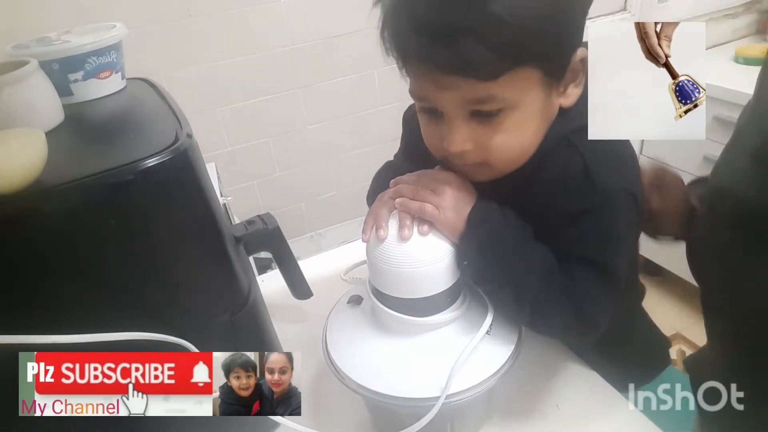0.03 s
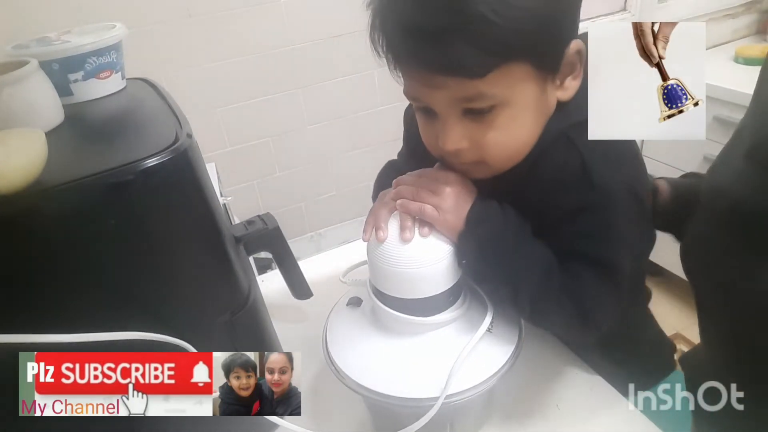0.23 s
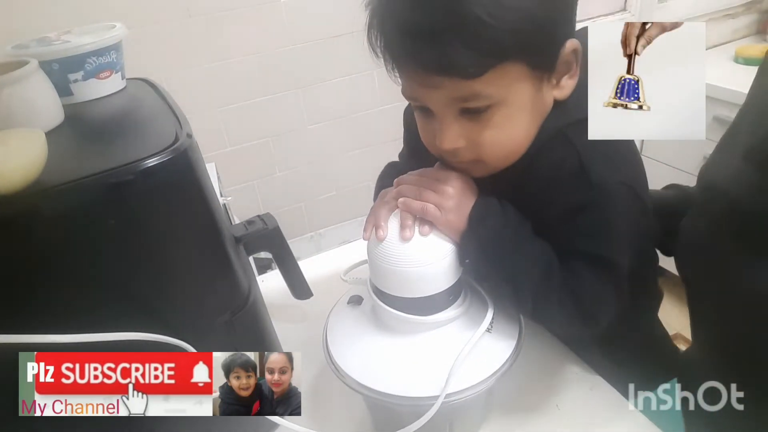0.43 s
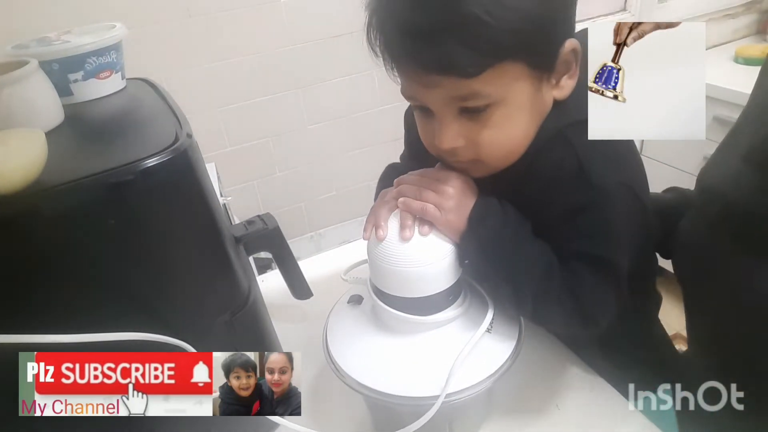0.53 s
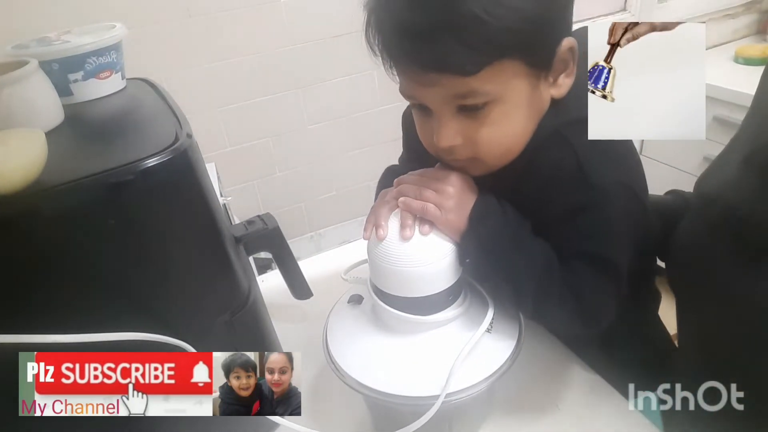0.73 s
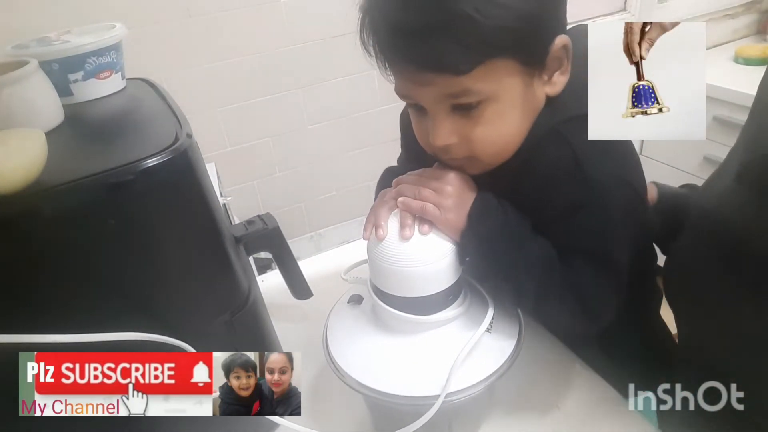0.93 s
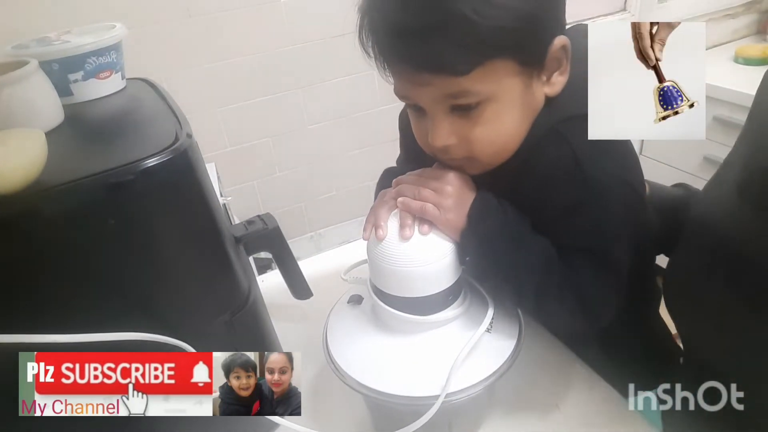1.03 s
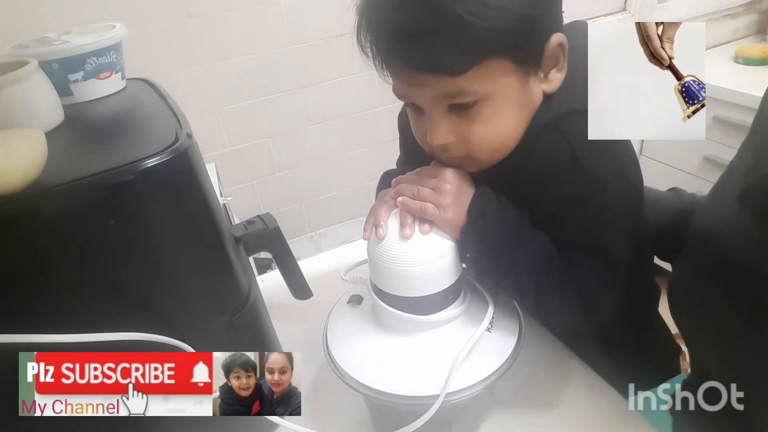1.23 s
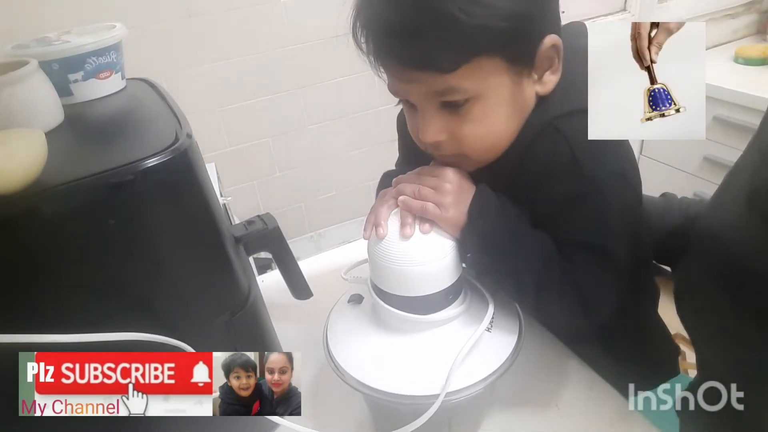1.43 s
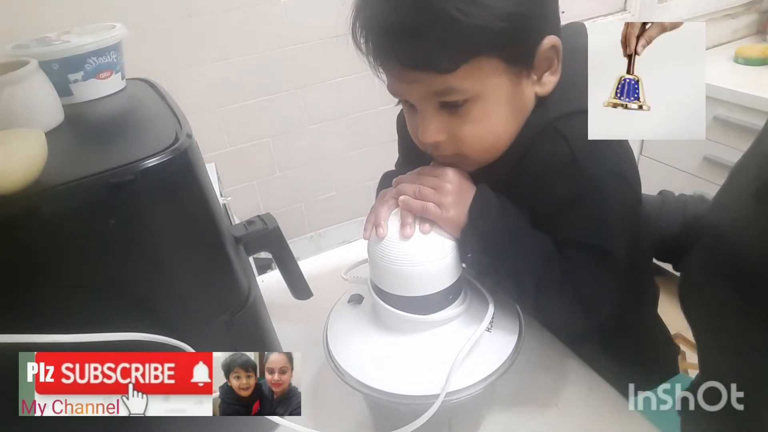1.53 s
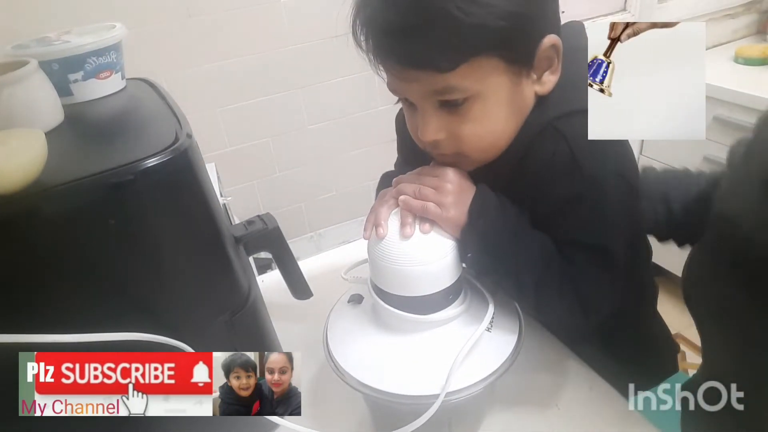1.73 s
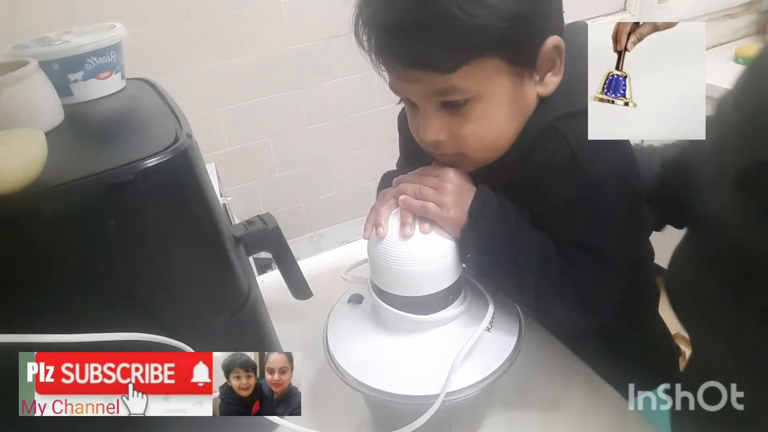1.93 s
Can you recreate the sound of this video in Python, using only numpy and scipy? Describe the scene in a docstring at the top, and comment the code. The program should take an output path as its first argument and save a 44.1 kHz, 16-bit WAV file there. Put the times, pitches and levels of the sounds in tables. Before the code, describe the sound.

An electric chopper whirs through one short pulse, flinging dry spices around its plastic bowl with surging rattles, crunches and a few low knocks before coasting to a stop. The microphone is close, in a small tiled kitchen.

```python
"""Small tiled kitchen, close microphones: an electric chopper on the counter is pressed once, grinds
hard dry spices and runs down. The motor hums as it starts; the unbalanced shaft whirrs. The load shakes
the housing, which drones at its low resonances, and jams knock it. The blade flings grit and coarse
pieces against the plastic bowl in surges; whole pieces clack on the wall, crunch and crack."""
import sys
import numpy as np
from scipy import signal
from scipy.fft import rfft, irfft
from scipy.io import wavfile
from scipy.ndimage import uniform_filter1d, map_coordinates

SR = 44100
rng = np.random.default_rng(int(sys.argv[2]) if len(sys.argv) > 2 else 0)


def wrap_up_sound(samples):
    """Save the sound to the file named by the first command line argument, as 16-bit audio."""
    columns = np.atleast_2d(samples).T
    # keep every value between -1 and 1, then stretch to whole-number steps
    tamed = np.clip(columns, -1, 1)
    steps = np.round(tamed * 32767).astype(np.int16)
    wavfile.write(sys.argv[1], SR, steps)


N = 88200
T = np.arange(N) / SR

START_S, STOP_S = .198, 1.45
GRIT_PER_S, GRIT_SCATTER_DB = 4600, 4.5
COARSE_PER_S, COARSE_SCATTER_DB = 900, 4

# background noise (frequency [Hz], gain [dB])
FLOOR_EQ = [(30, -3), (100, -1), (400, -10), (1500, -23), (15000, -21)]
# echo off the tiles (frequency [Hz], gain [dB])
ROOM_EQ = [(80, -32), (180, 8), (350, 2.5), (700, 0), (4000, -0.5), (15000, -12.5)]
# stereo width (frequency [Hz], side gain [dB])
SIDE_EQ = [(30, -10), (110, -16), (180, -10), (320, -2), (15000, 2)]
# microphone response (frequency [Hz], left [dB], right [dB])
MIC_EQ = [(30, -40.5, -32), (51.4, -19.5, -15.5), (91, -1, -1), (2620, 2, 2), (3790, -0.5, -2.5),
          (4290, -3, -1.5), (4680, 4, 1.5), (6300, -0.5, 3.5), (8010, 1, 0), (8930, -11.5, -12.5),
          (9800, -7.5, -9.5), (10710, 2.5, -14), (12500, 2.5, -3.5), (15500, 2, -4.5)]
# starting-current hum (frequency [Hz], level [dB])
HUM_PARTIALS = [(102, -22.5), (202, -38), (303, -39.5)]
# shaft tone (time [s], frequency [Hz])
SHAFT_PITCH = [(.2, 158.5), (.5, 161.5), (.65, 161.5), (0.869, 158.5), (1.1, 155), (1.222, 166),
               (1.323, 182), (1.44, 187), (1.559, 176.5), (1.679, 167), (2.0, 163)]
# shaft harmonics 1 and 2 (level re drone [dB])
WHIRR_HARMONICS_DB = [-11.5, -6.5]
# housing vibration (time [s], drone [dB], rumble [dB])
SHAKE_LEVELS = [(.19, -55, -49), (.22, -29.5, -32.5), (.3, -35.5, -29), (.395, -33, -34),
                (.436, -23, -18.5), (.496, -27.5, -26.5), (.6, -25.5, -27.5), (.66, -21.5, -27),
                (.7, -24.5, -31), (.78, -26, -29), (.884, -23.5, -28), (1.06, -36.5, -30.5),
                (1.09, -30, -19), (1.15, -26.5, -33), (1.19, -27, -39), (1.294, -17, -27),
                (1.354, -22.5, -27.5), (1.41, -25.5, -51), (1.46, -26, -31.5), (1.6, -29, -33),
                (1.665, -28, -33), (1.76, -32.5, -34.5), (1.894, -40, -45.5), (2.0, -69, -67)]
# housing and counter resonances (frequency [Hz], t60 [s], left [dB], right [dB])
DRONE_MODES = [(313, 0.076, 2.5, -3), (351.7, 0.058, 2, -1.5), (395, 0.028, -6, -10.5)]
RUMBLE_MODES = [(112.4, 0.23, -11, -4.5), (164.4, 0.1, 9, -3), (187.5, 0.05, -19, 5.5)]
# jams knocking the housing (time [s], level [dB])
JAMS = [(0.2088, -12), (0.2192, -5.5), (0.65, -10), (1.069, -5), (1.082, -6.5), (1.0881, -7), (1.288, -4.5)]
# plastic bowl resonances (frequency [Hz], t60 [s], left [dB], right [dB])
BOWL_MODES = [(586, 0.07, -11, -2.5), (672.6, 0.066, -6, -7.5), (951, 0.029, 5.5, -5),
              (1166, 0.027, 4.5, -13), (1405, 0.052, 3, -1), (1513, 0.045, -5, -0.5),
              (1680, 0.051, -3.5, 0), (1813, 0.052, -7.5, -6), (2285, 0.055, -18, -6.5),
              (3475, 0.016, 10, -5.5), (3740, 0.017, 9, 6), (4810, 0.018, -7, 1.5)]
# hard pieces hitting the bowl (time [s], clack [dB], crunch [dB])
WALL_STRIKES = [(.4086, -16, -14), (.4415, -16, -18), (0.6098, -22, -31), (0.654, -18, -19),
                (0.7723, -20, -23), (0.8303, -23, -26), (0.8655, -28, -12), (.882, -21, -13),
                (1.0806, -23.5, -10.5), (1.197, -19.5, -35), (1.2567, -18, -20), (1.286, -20.5, -7),
                (1.305, -22, -19), (1.3215, -20.5, -12), (1.356, -23, -16), (1.4525, -14.5, -26),
                (1.512, -27, -23), (1.811, -34.5, -36)]
# whole pieces shattering (time [s], level [dB], centre [Hz])
PIECE_CRACKS = [(0.2342, -13, 2250), (0.297, -18, 7200), (0.371, -6, 6700), (0.383, -15, 6500),
                (0.426, -14, 4000), (0.4412, -13, 4500), (0.676, -8.5, 4500), (0.682, -19, 4570),
                (0.73, -11, 5240), (1.1362, -19, 4700), (1.146, -6.5, 8700), (1.194, -12, 11000),
                (1.2555, -14.5, 11100), (1.268, -14, 4400), (1.284, -16, 7000), (1.447, -17, 7800),
                (1.9, -44, 11100), (1.927, -48.5, 5060)]
# fine and coarse impact spectra (frequency [Hz], gain [dB])
GRIT_EQ = [(500, -4.5), (1500, -25), (2300, -8), (3600, 2.5), (4200, 1), (4900, -2), (5500, -0.5),
           (6500, 1), (8000, 0.5), (12000, -0.5), (15500, -4.5)]
COARSE_EQ = [(100, -16.5), (220, -1), (450, -0.5), (620, 0.5), (760, -1.5), (1000, -1), (1600, -5.5),
             (2200, -0.5), (4000, -8.5), (12000, -35)]
# grinding surges (time [s], grit [dB], coarse [dB])
GRIND_LEVELS = [(.198, -45, -51), (.204, -38.5, -40.5), (.216, -29, -26.5), (.236, -21.5, -24.5),
                (.335, -26, -29), (.368, -19.5, -27), (.4, -19.5, -27), (.425, -13.5, -19.5),
                (.476, -18.5, -25), (.55, -16, -23.5), (.598, -20, -26.5), (.635, -14, -21),
                (.675, -15.5, -17.5), (.695, -16, -24), (.78, -18, -23.5), (.825, -21.5, -27.5),
                (.874, -18.5, -21.5), (1.05, -25.5, -30), (1.085, -21, -20.5), (1.135, -16, -23),
                (1.165, -20.5, -28.5), (1.248, -20, -24), (1.268, -16.5, -21), (1.3, -19.5, -21),
                (1.41, -23.5, -25), (1.51, -24, -25.5), (1.8, -37, -36.5), (1.908, -50, -49.5),
                (2.0, -70, -72)]


def undb(db):
    """Decibels to gain."""
    return 10 ** (np.asarray(db) / 20)


def unit(x):
    """Scale to rms 1."""
    return x / np.sqrt(np.mean(x ** 2))


def curve(table, column):
    """Gain over time from a dB column; zero before switch-on."""
    rows = np.array(table)
    return undb(np.interp(T, rows[:, 0], rows[:, column])) * (T > START_S)


def fade(t, t60_s):
    """Exponential decay."""
    return np.exp(-np.log(1000) * t / t60_s)


def blow(at_s, rise_s, t60_s, hold_s=0):
    """Impact envelope: rise, hold, decay."""
    age_s = np.maximum(T - at_s, 0)
    return (1 - np.exp(-age_s / rise_s)) * fade(np.maximum(age_s - hold_s, 0), t60_s)


def ring(x, response):
    """Convolve with an impulse response."""
    return signal.fftconvolve(np.atleast_2d(x), np.atleast_2d(response), axes=1)[:, :N]


def bin_gains(eq, size):
    """Gain per FFT bin, interpolated over log frequency."""
    hz, db = np.array(eq, float).T
    bin_hz = np.arange(size // 2 + 1) * SR / size
    return undb(np.interp(np.log(bin_hz + 1), np.log(hz), db))


def colour(x, eq, size=4096):
    """Minimum-phase filter through (frequency [Hz], gain [dB]) points."""
    cepstrum = irfft(np.log(bin_gains(eq, size)))
    cepstrum[1:size // 2] *= 2
    cepstrum[size // 2 + 1:] = 0
    return ring(x, irfft(np.exp(rfft(cepstrum))))


def walk(per_s):
    """Smooth random drift, rms 1."""
    span = int(SR / per_s)
    steps = np.repeat(rng.standard_normal(N // span + 1), span)
    return unit(uniform_filter1d(uniform_filter1d(steps, span), span)[:N])


def stereo_noise(size, shared=.13):
    """White noise, partly common to both sides."""
    noise = rng.standard_normal((3, size))
    return np.sqrt(shared) * noise[0] + np.sqrt(1 - shared) * noise[1:]


def steady(x, window_s):
    """Even out swells: divide by the running rms."""
    return x / np.sqrt(uniform_filter1d(np.mean(x ** 2, axis=0), int(window_s * SR)) + 1e-9)


def detune(x, share):
    """Shift pitch by a time-varying fraction."""
    position = np.arange(N) + np.cumsum(share)
    return np.array([map_coordinates(side, [position], mode="mirror") for side in x])


def impacts(per_s, scatter_db):
    """Random taps of scattered strength."""
    strength = undb(scatter_db * np.clip(rng.standard_normal(N), -2, 2))
    return (rng.random(N) < per_s / SR) * strength * rng.choice([-1, 1], N)


def resonate(taps, modes, spread_rad):
    """Taps excite each mode by a random amount; the two sides ring out of phase."""
    t, out = T[:SR // 4], 0
    for k, (hz, t60_s, left_db, right_db) in enumerate(modes):
        phase = (-1) ** k * spread_rad * np.array([[.5], [-.5]])
        response = undb([[left_db], [right_db]]) * np.sin(2 * np.pi * hz * t + phase) * fade(t, t60_s)
        out = out + ring(taps * (1 + rng.standard_normal(N)), response)
    return unit(out)


def narrow(x):
    """Long waves reach both close-set microphones alike: near-mono bass."""
    side = irfft(rfft((x[0] - x[1]) / 2, 2 * N) * bin_gains(SIDE_EQ, 2 * N))[:N]
    return x.mean(axis=0) + np.array([side, -side])


def noise_floor(level_db=-77):
    """Faint, steady kitchen background."""
    return undb(level_db) * unit(colour(stereo_noise(N), FLOOR_EQ))


def tile_echo(direct, level_db=-9, t60_s=.11, gap_s=.005):
    """Short diffuse reflection off the tiles."""
    t = T[:SR // 2]
    tail = rng.standard_normal((2, len(t))) * fade(t, t60_s) * (t > gap_s)
    tail /= np.sqrt(np.sum(tail ** 2) / 2)
    return undb(level_db) * ring(colour(direct, ROOM_EQ), tail)


def motor_hum(rise_s=.063, on_s=.093, release_s=.011):
    """Starting current hums until the motor is up to speed."""
    age_s = T - START_S
    envelope = np.clip(age_s / rise_s, 0, 1) * np.clip(1 - (age_s - on_s) / release_s, 0, 1)
    return envelope * sum(undb(db) * np.sin(2 * np.pi * hz * age_s) for hz, db in HUM_PARTIALS)


def shaft_hz():
    """Shaft tone frequency over time."""
    times_s, hz = np.array(SHAFT_PITCH).T
    return np.interp(T, times_s, hz)


def shaft_whirr(wander=.02465, flutter_db=4):
    """The unbalanced shaft gives a wavering tone; uneven load makes it flutter."""
    turns = np.cumsum(shaft_hz() * (1 + wander * walk(per_s=30))) / SR
    flutter = unit(undb(flutter_db * walk(per_s=90)))
    tone = sum(undb(db) * np.sin(2 * np.pi * k * turns) for k, db in enumerate(WHIRR_HARMONICS_DB, 1))
    return curve(SHAKE_LEVELS, 1) * flutter * np.sqrt(2) * tone


def housing(sweep, pitch_follow=.45):
    """Blade load shakes the housing: a rumble, and a drone that lifts and sags with the shaft."""
    taps, hz = impacts(COARSE_PER_S * sweep, COARSE_SCATTER_DB), shaft_hz()
    drone = resonate(taps, DRONE_MODES, spread_rad=.81)
    drone = steady(detune(drone, pitch_follow * (hz / hz[0] - 1)), window_s=.048)
    rumble = steady(resonate(taps, RUMBLE_MODES, spread_rad=.075), window_s=.0334)
    return drone * curve(SHAKE_LEVELS, 1) + undb(.5) * rumble * curve(SHAKE_LEVELS, 2)


def knocks(hz=176):
    """Jammed pieces knock the housing: one damped low tone each."""
    return sum(undb(db) * blow(at_s, rise_s=.00052, t60_s=.023) * np.sin(2 * np.pi * hz * (T - at_s))
               for at_s, db in JAMS)


def bowl_clack(tilt_db_per_octave=6.5, rise_s=.0008, body_s=.005):
    """Bowl response to a hard contact, which favours the high modes."""
    t, clack = T[:SR // 4], 0
    for hz, t60_s, left_db, right_db in BOWL_MODES:
        gain = undb([[left_db], [right_db]]) * undb(tilt_db_per_octave * np.log2(hz))
        clack = clack + gain * np.sin(2 * np.pi * hz * t) * fade(t, t60_s)
    clack *= 1 - np.exp(-t / rise_s)
    return clack / np.std(clack[:, t < body_s])


def strikes():
    """Hard pieces clack on the wall and crunch as the blade crushes them."""
    taps, crush = np.zeros(N), 0
    for at_s, clack_db, crunch_db in WALL_STRIKES:
        taps[int(at_s * SR)] = undb(clack_db)
        crush = crush + undb(crunch_db) * blow(at_s, rise_s=.001, t60_s=.023)
    return ring(taps, bowl_clack()) + crush * unit(colour(stereo_noise(N), COARSE_EQ))


def cracks(peak_db=23.5):
    """Whole pieces shatter in short bursts, each peaking at a frequency set by its size."""
    out = 0
    for at_s, db, hz in PIECE_CRACKS:
        peak_eq = [(hz / 2, 0), (hz, peak_db), (hz * 2, 0)]
        burst = unit(colour(colour(stereo_noise(N), GRIT_EQ), peak_eq))
        out = out + undb(db) * blow(at_s, rise_s=.0004, t60_s=.007, hold_s=.0018) * burst
    return out


def blade_sweep(pass_hz=79.85, wander=.12, depth=.2, spin_up_tau_s=.035, coast_tau_s=.54):
    """Relative impact rate: hits bunch at each pass as the blade spins up, runs and coasts."""
    spin_up = 1 - np.exp(-np.maximum(T - START_S, 0) / spin_up_tau_s)
    coast = np.exp(-np.maximum(T - STOP_S, 0) / coast_tau_s)
    passes = np.cumsum(pass_hz * spin_up * coast * (1 + wander * walk(per_s=12))) / SR
    return 1 + depth * np.cos(2 * np.pi * passes)


def clatter(per_s, scatter_db, eq, t60_s, spots=8, size=2048):
    """Fragments tap several spots on the wall, each with its own short, dense ring."""
    decay = fade(T[:size], t60_s)
    hits = sum(ring(impacts(per_s / spots, scatter_db), stereo_noise(size) * decay) for _ in range(spots))
    return unit(colour(hits, eq))


def spices(sweep, grit_db=2, bowl_drift=.022):
    """Fine grit hisses round the bowl; coarse pieces rattle and ring it."""
    grit = clatter(GRIT_PER_S * sweep, GRIT_SCATTER_DB, GRIT_EQ, t60_s=.017)
    coarse = clatter(COARSE_PER_S * sweep, COARSE_SCATTER_DB, COARSE_EQ, t60_s=.06)
    bowl = resonate(impacts(COARSE_PER_S * sweep, COARSE_SCATTER_DB), BOWL_MODES, spread_rad=1.68)
    bowl = detune(bowl, bowl_drift * walk(per_s=40))  # shifting load moves the ring
    hiss = undb(grit_db) * steady(grit, window_s=.166)
    rattle = steady(coarse, window_s=.037) + steady(bowl, window_s=.073)
    return hiss * curve(GRIND_LEVELS, 1) + rattle * curve(GRIND_LEVELS, 2)


def scene():
    """Chopper, tile echo and kitchen background."""
    sweep = blade_sweep()
    direct = spices(sweep) + cracks() + strikes() + housing(sweep) + knocks()
    direct += motor_hum() + shaft_whirr()
    return narrow(direct + tile_echo(direct)) + noise_floor()


def record(dry, cutoff_hz=15750):
    """Each microphone notches the treble its own way; full-scale clip, then low-pass."""
    eq = np.array(MIC_EQ)
    heard = np.vstack([colour(dry[0], eq[:, [0, 1]]), colour(dry[1], eq[:, [0, 2]])])
    lowpass = signal.ellip(10, .2, 70, cutoff_hz, fs=SR, output="sos")
    return signal.sosfilt(lowpass, np.clip(heard, -1, 1))


dry = scene()
out = record(dry)
wrap_up_sound(out)
```